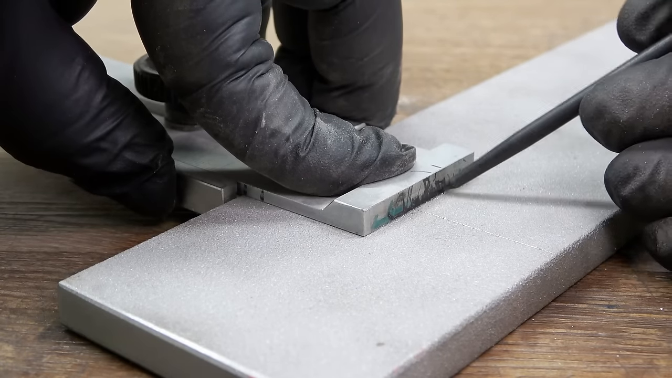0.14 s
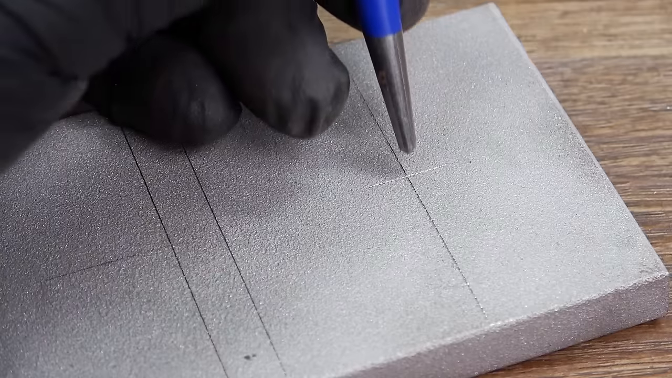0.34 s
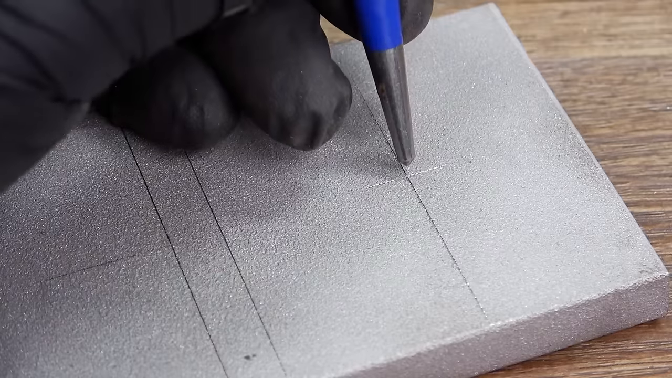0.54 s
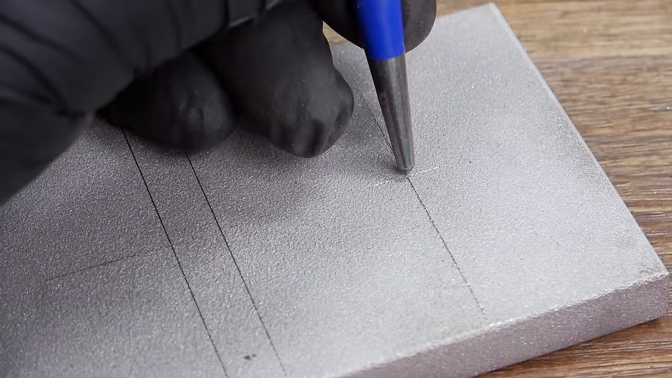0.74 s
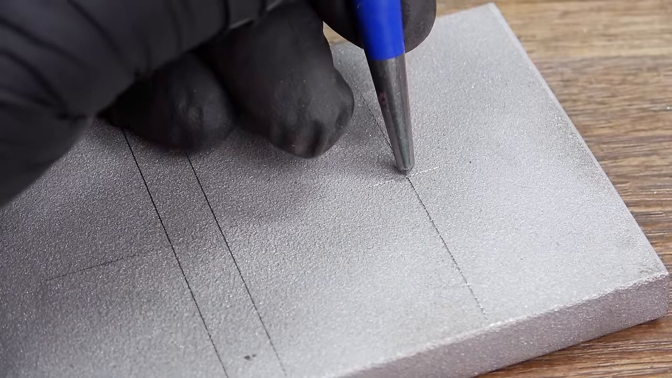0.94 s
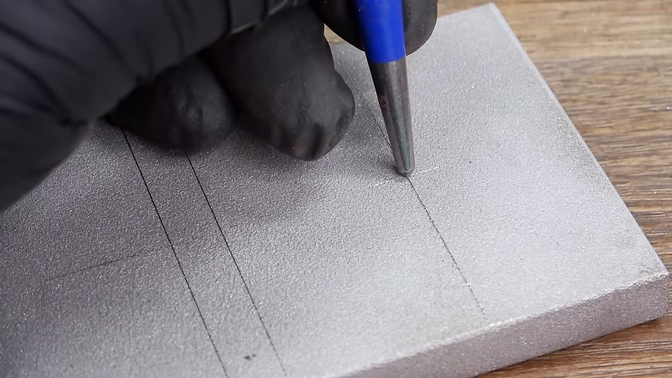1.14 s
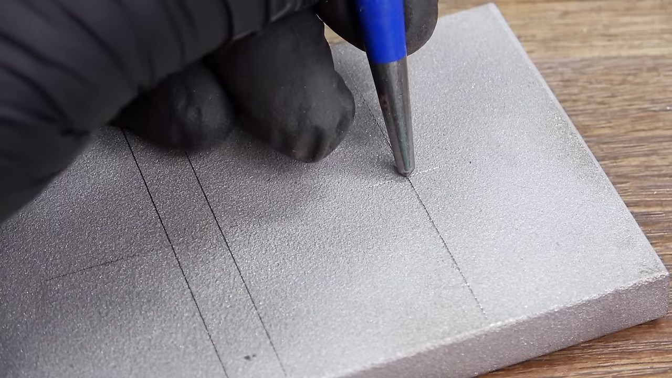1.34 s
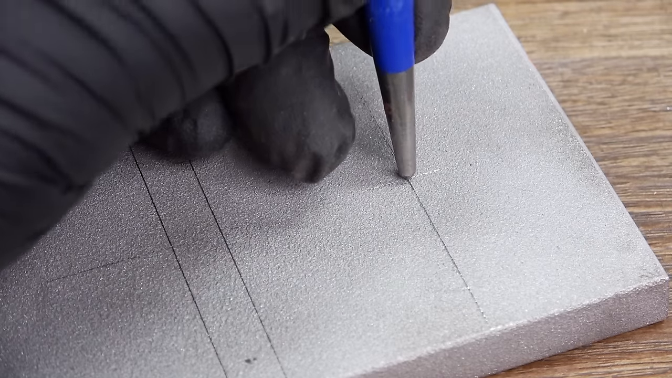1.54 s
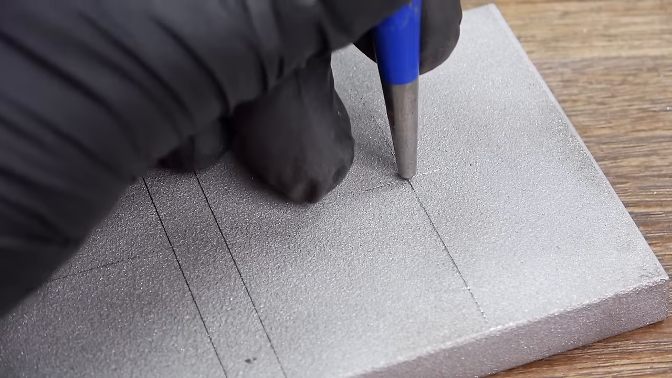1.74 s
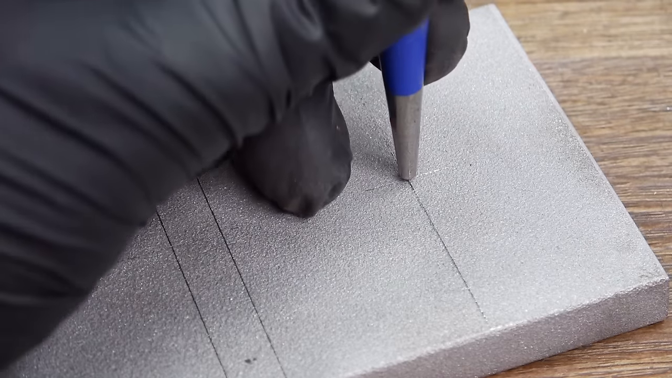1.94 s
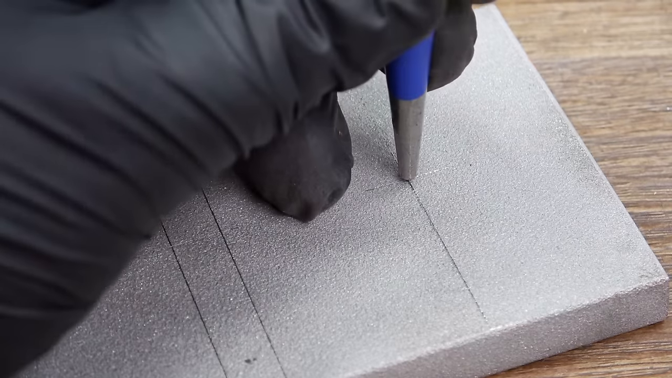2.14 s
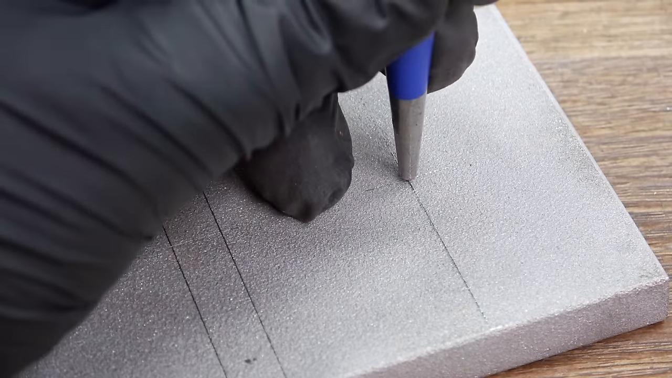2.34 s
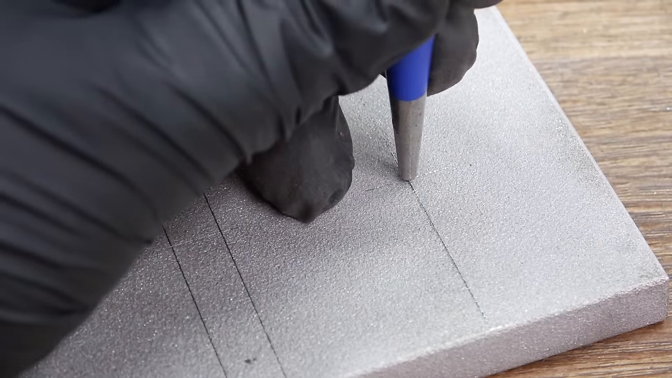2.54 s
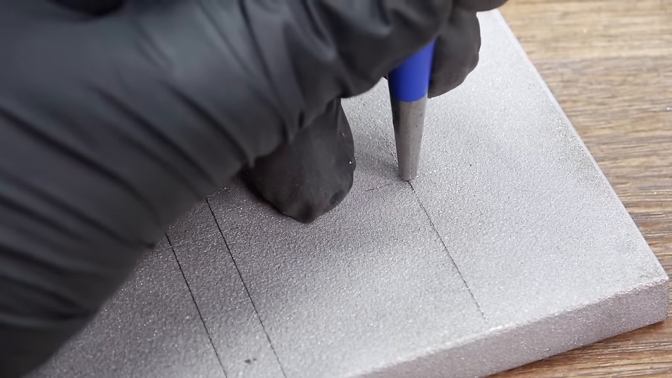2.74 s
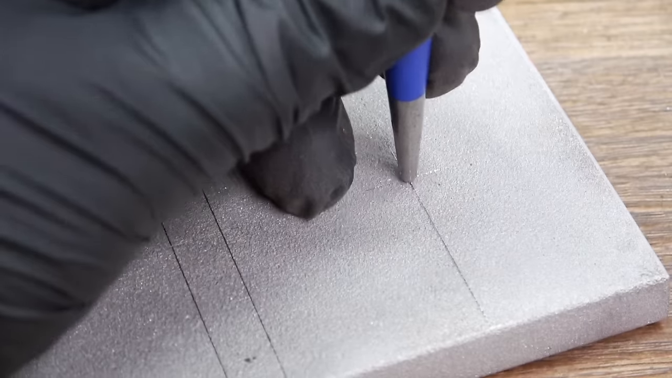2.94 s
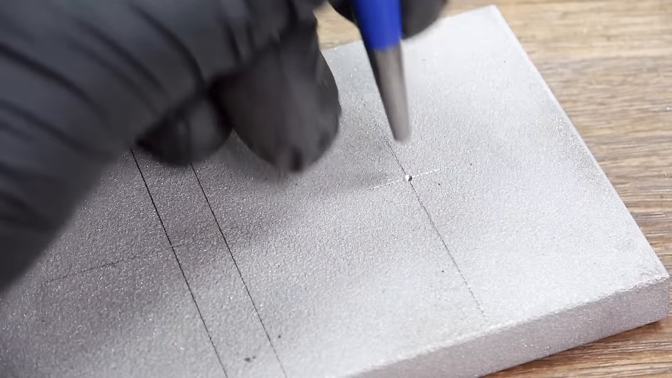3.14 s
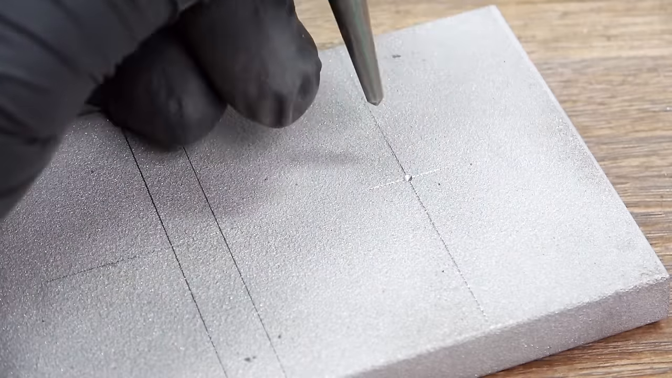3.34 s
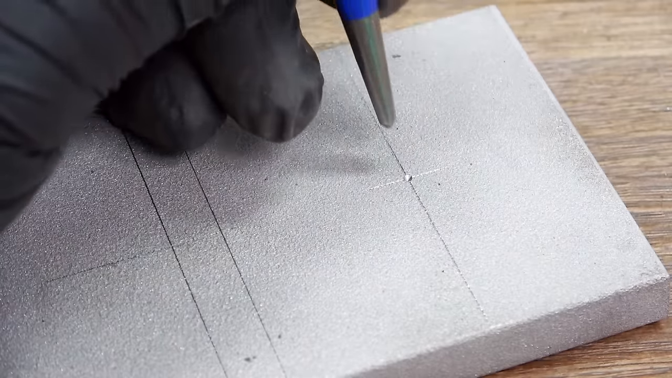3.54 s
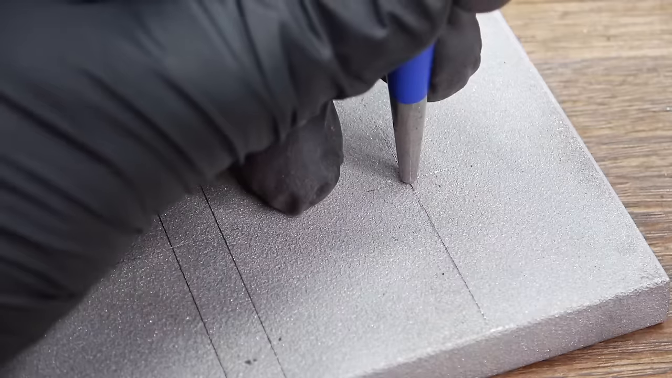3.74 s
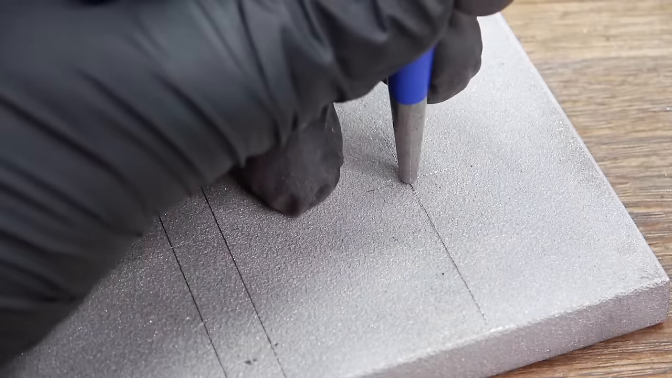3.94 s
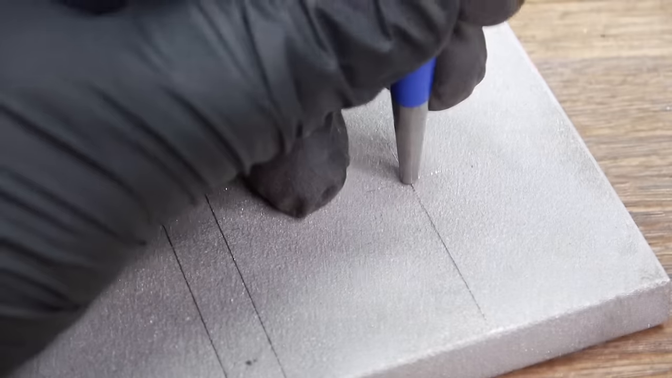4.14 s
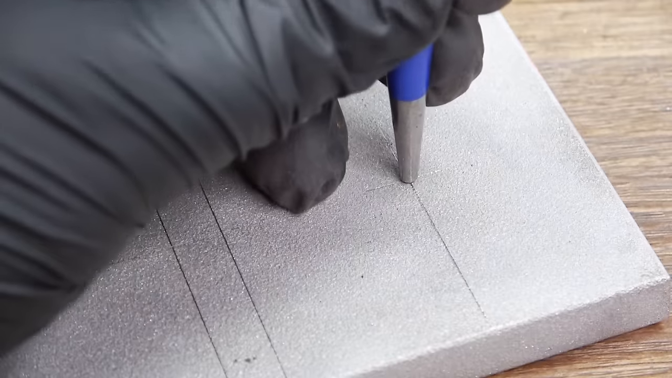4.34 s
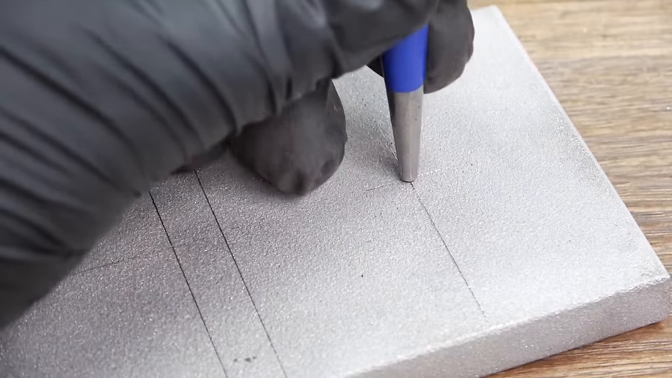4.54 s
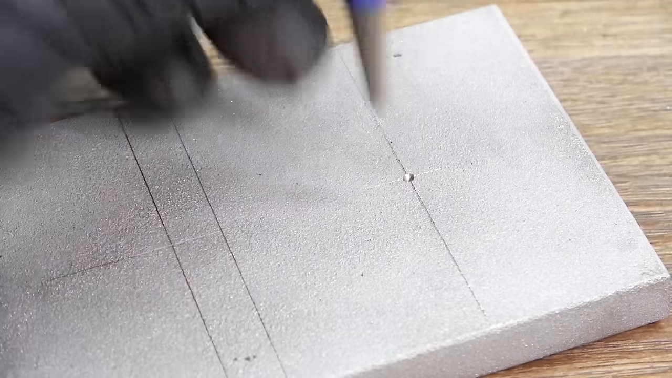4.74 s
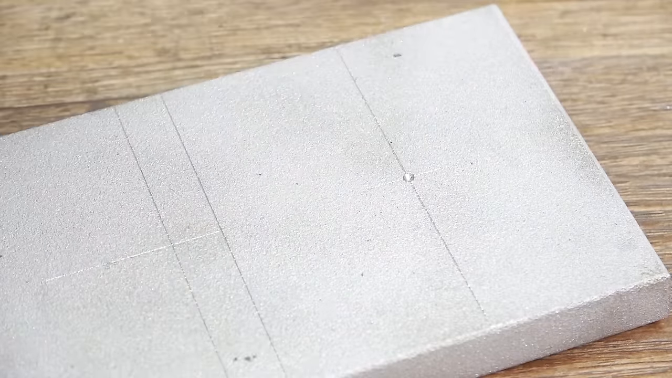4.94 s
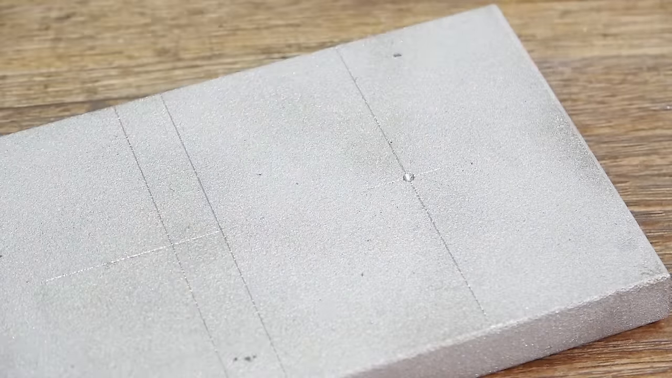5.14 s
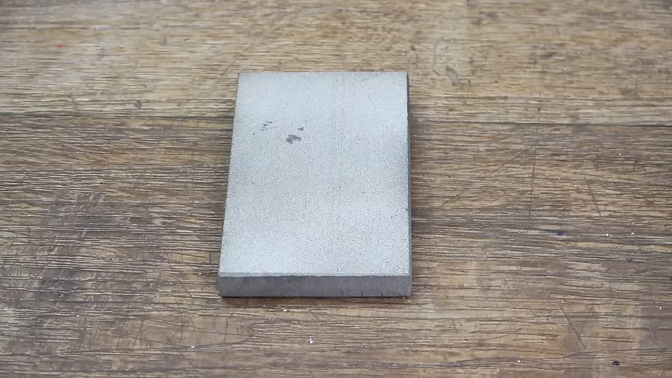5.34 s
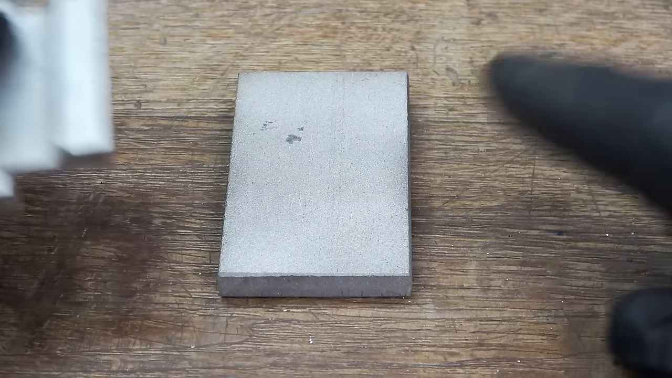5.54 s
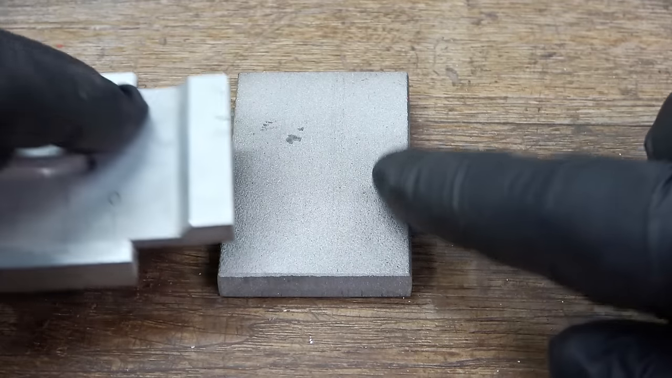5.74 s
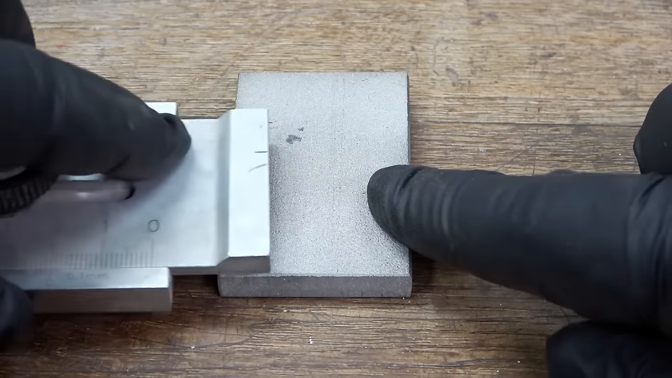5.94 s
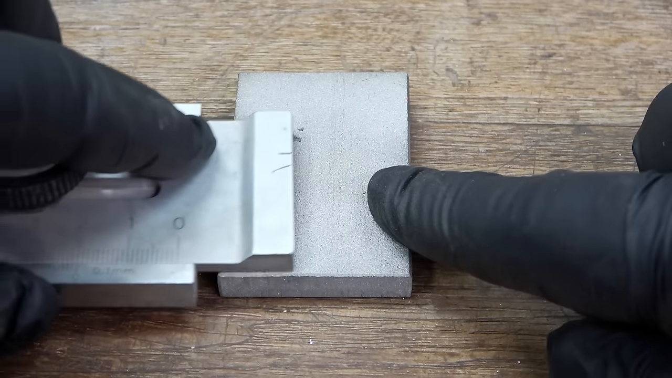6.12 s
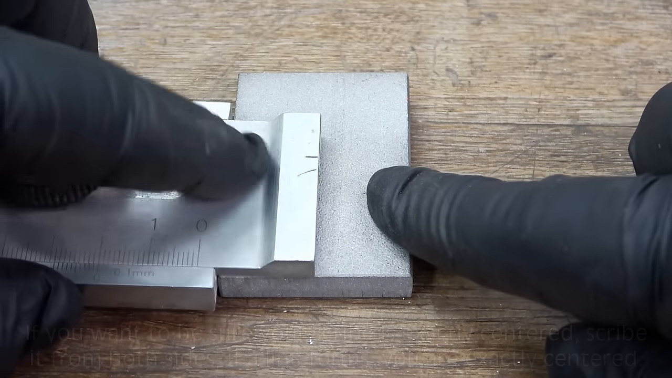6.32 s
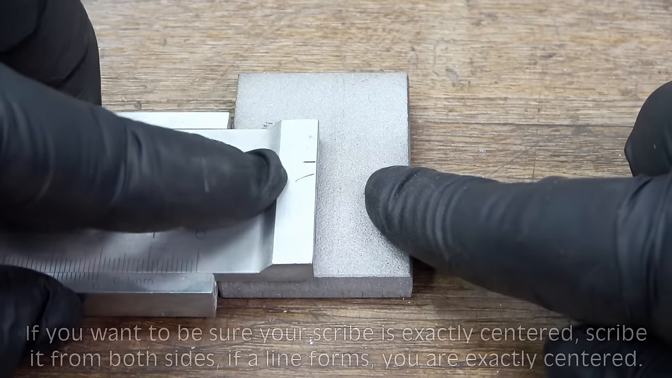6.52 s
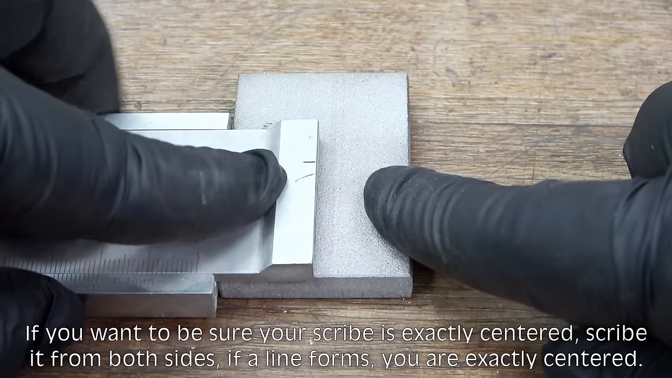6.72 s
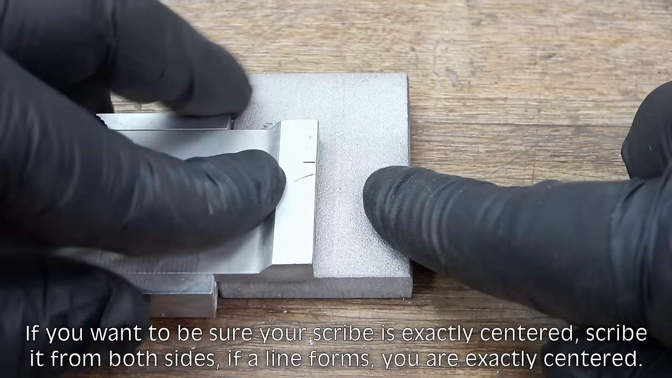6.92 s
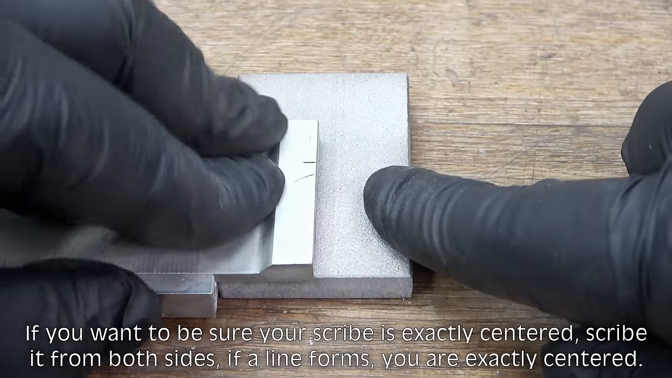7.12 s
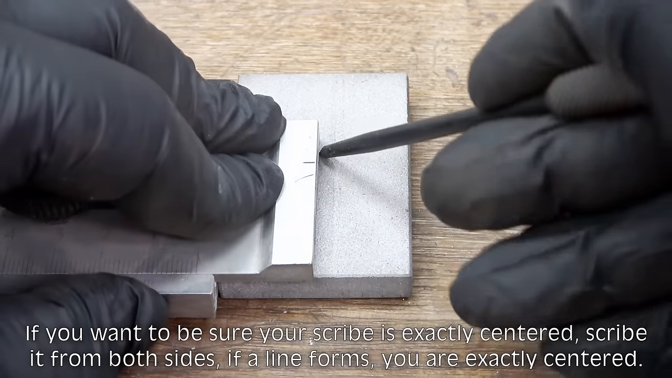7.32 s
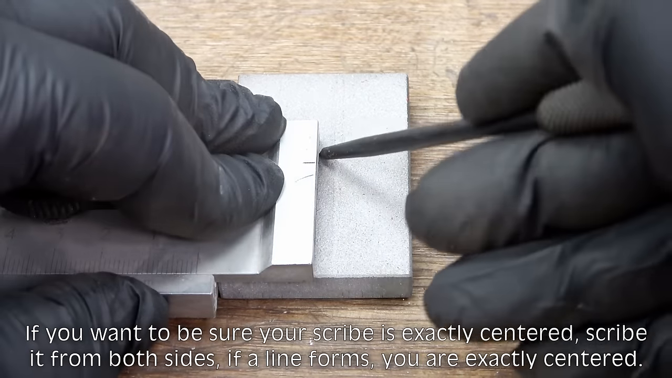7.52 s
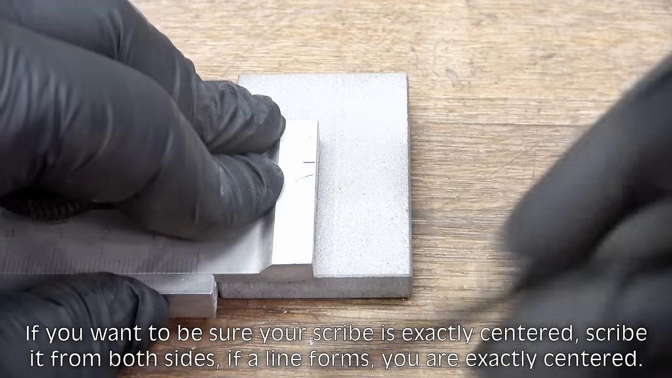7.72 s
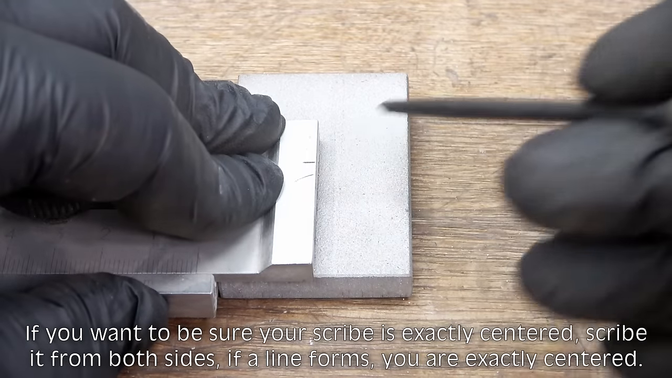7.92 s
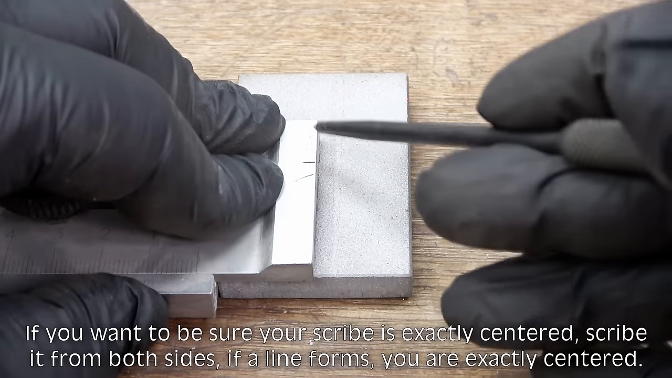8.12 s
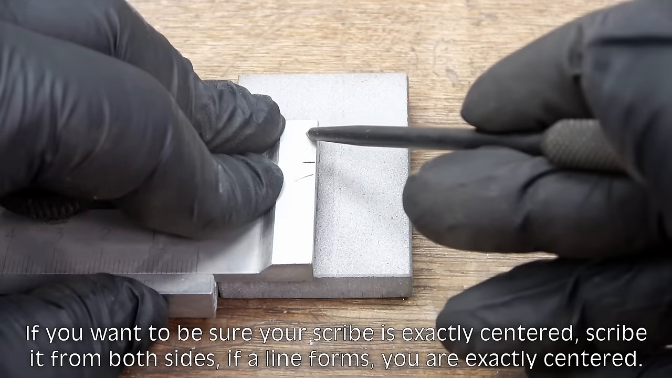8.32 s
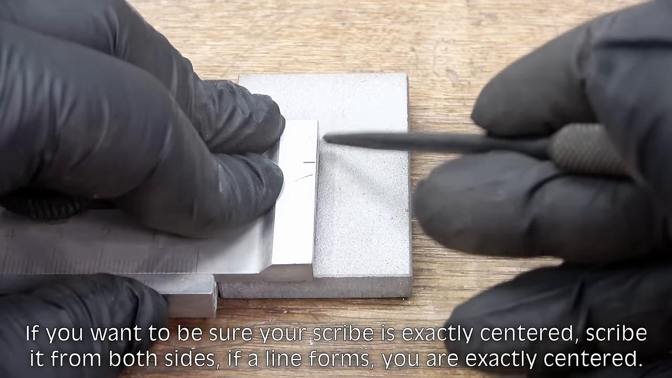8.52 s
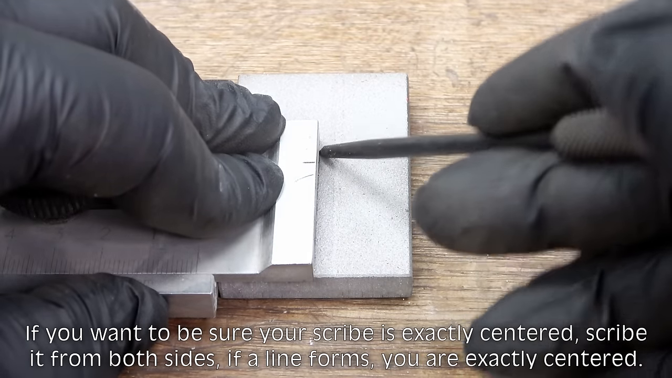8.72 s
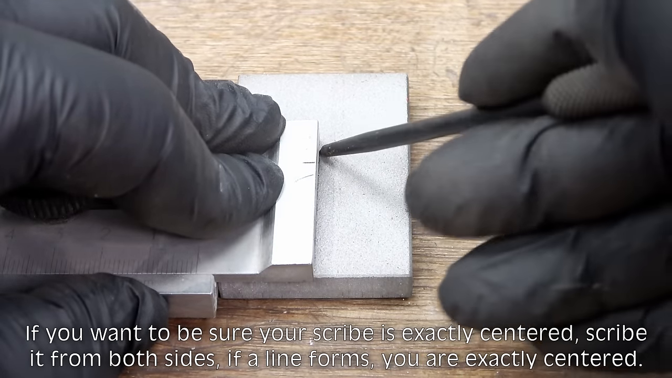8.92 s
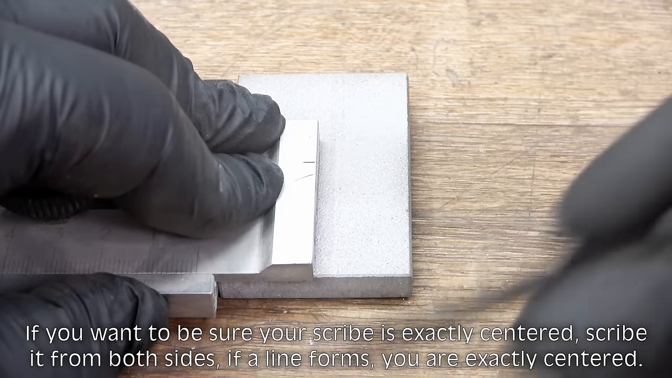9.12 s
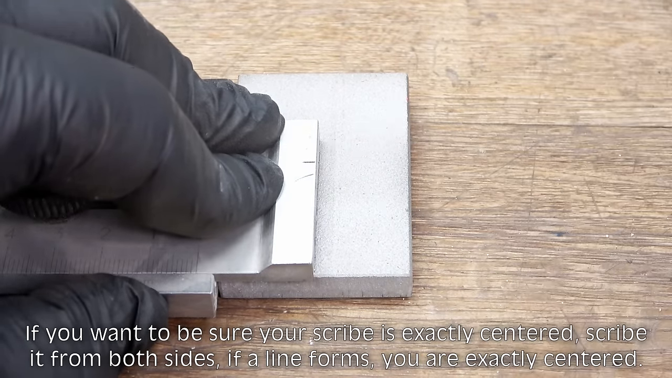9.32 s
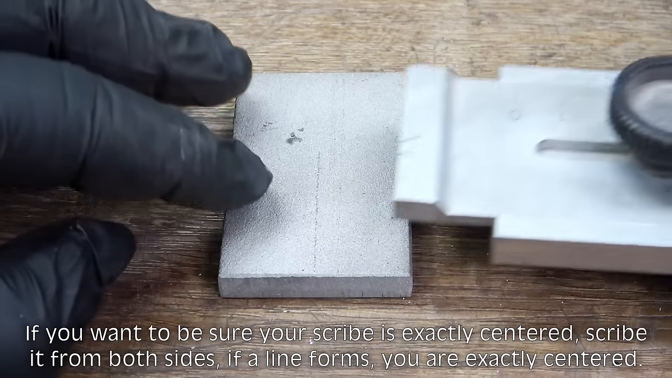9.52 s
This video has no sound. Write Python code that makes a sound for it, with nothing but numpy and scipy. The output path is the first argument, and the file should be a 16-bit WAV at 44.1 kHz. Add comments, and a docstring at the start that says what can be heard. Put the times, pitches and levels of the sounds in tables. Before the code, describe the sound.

Close stereo in a workshop with faint hiss and rumble. After the remnant of an earlier knock, a light hammer tap precedes a violent metallic bang with bassy boom, then a firmer tap and an even louder bang, its tail cut abruptly. Quiet handling and glove rustle follow, then a sharp gauge clack on steel, small knocks, brief gritty scrapes, delicate scriber scratches and a final pair of clacks.

```python
"""A hammer drives a punch into a steel plate, lightly then hard, twice: noise crack, modal knock, decaying boom.
Gauge and scriber excite modes of bench, frame and steel, by single knocks or by trains of random slips;
glove rubs are shaped hiss, over a noise floor and the tail of an earlier knock, close to a stereo microphone.
Hard blows overload the microphone, a limiter holds the peaks, and splices cut the room's tail short."""
import sys
import numpy as np
from scipy import signal
from scipy.io import wavfile
from scipy.ndimage import uniform_filter1d

SR = 44100
rng = np.random.default_rng(int(sys.argv[2]) if len(sys.argv) > 2 else 0)


def unload_wav(signal):
    """Save mono or channel-first audio to the path in sys.argv[1] as 16-bit WAV at rate SR, clipped to [-1, 1]."""
    wavfile.write(
        sys.argv[1],
        SR,
        np.round(np.clip(np.atleast_2d(signal).T, -1, 1) * 32767).astype(np.int16),
    )


N = 422037
LEAD = SR // 5  # samples of sound before time zero
RAIL_DB = -11  # the microphone's overload level

# instants where one piece ends and the next begins: start_s
SPLICE_TIMES = (.257, 3.61, 5.32, 9.437)

# relative spectrum of the background: pitch_hz, density_db
FLOOR_SPECTRUM = [(12, -34), (20, 2), (48, -6), (74, -23), (210, -18.5), (270, -21.5), (301, -21),
                  (513, -25.5), (558, -25), (897, -27), (1220, -28.5), (1860, -34), (16000, -37.5)]
# left-right likeness of the background: pitch_hz, likeness
FLOOR_LIKENESS = [(60, 0.8), (240, 0.33), (950, 0.3), (3770, 0.39), (15000, 0.22)]

# reverberation time of the room: pitch_hz, t60_s
ROOM_DECAY = [(30, 1.6), (110, 1.226), (280, 0.6), (740, 0.45), (2000, 0.45), (5000, 0.43), (9000, 0.29),
              (15000, 0.32)]
# relative spectrum of the room's answer: pitch_hz, level_db
ROOM_SPECTRUM = [(40, 0.5), (120, 0), (250, 6.5), (700, 2.5), (1500, 7.5), (4500, 9.5), (14000, 5)]
# left-right likeness of the room's answer: pitch_hz, likeness
ROOM_LIKENESS = [(60, 0.95), (200, 1), (500, .7), (1000, 0.47), (3000, 0.11), (8000, 0.11)]
# ring of the small plate on the bench within the tail: pitch_hz, width_hz, level_db, t60_s
PLATE_RESONANCE = [(1590, 440, 4, 0.4)]

# relative spectrum of the earlier knock's tail: pitch_hz, density_db
EARLIER_SPECTRUM = [(18, -38), (30, -29), (215, -5), (937, -25), (1160, -21), (1960, -30), (4190, -25),
                    (14800, -38), (16000, -69)]
# rings in that tail: pitch_hz, width_hz, level_db, t60_s
EARLIER_RESONANCES = [(1164, 41, 14.5, 0.36), (2370, 21, 23, 0.38), (4200, 47, 12, 0.52)]

# nominal modes of the bench top: pitch_hz, level_db, t60_s
BENCH_MODES = [(396, -12, 0.0084), (530, -1.5, 0.048), (640, -6, 0.032), (725, 4.5, 0.015),
               (811, 4.5, 0.025), (940, -8, 0.089), (1035, -5, 0.045), (1180, -3, 0.045), (1360, 7, 0.0097),
               (1599, -6, 0.064), (1800, -5.5, 0.014), (2100, -9, 0.04)]
# nominal modes of the bench frame: pitch_hz, level_db, t60_s
FRAME_MODES = [(92, -6, 0.13), (100.4, -9, 0.4), (148.2, -5.5, 0.2), (185.8, -1, 0.075), (253, -11, 0.089)]
# nominal modes of the steel: pitch_hz, level_db, t60_s
STEEL_MODES = [(2550, -6, .02), (3400, -9, .015), (4050, -10, .015), (4450, -8, .02), (5400, -7, .015),
               (5900, -6, .025), (6360, -5, .02), (6800, -3, .03), (7860, -2, .03), (9000, -1, .025),
               (9700, -7, .02), (11800, -3, .02), (14100, -6, .015)]

# a steel tip ticks lightly: start_s, ring_db, centre_hz
TICK_EVENTS = [(.189, -50.5, 3300), (1.555, -63.5, 4000), (1.901, -58, 7370), (1.962, -59.5, 2600),
               (2.3, -60.5, 4200), (2.355, -66, 4500), (4.69, -58, 4700), (4.987, -61.5, 6240),
               (5.329, -58.5, 3860), (7.06, -45, 7950), (7.075, -50, 4230), (8.851, -47, 6250)]
# hands and tools bump the bench: start_s, thump_db (frame), thud_db (top)
BUMP_EVENTS = [(1.525, -37, -43.5), (1.551, -52, -75), (2.295, -64, -59.5), (3.635, -36.5, -51),
               (4.689, -35.5, -78), (5.12, -39, -64), (5.895, -58.5, -72), (6.491, -52, -42)]
# gauge and scriber knock the plate: start_s, thud_db (bench top), thud_hz, thump_db (frame),
# ring_db (steel), ring_hz, room_share_db
KNOCK_EVENTS = [(6.12, -17, 910, -43, -22, 3560, -9), (6.239, -34.5, 666, -44, -27.5, 2740, -2.5),
                (6.287, -20.5, 2100, -61, -34, 5980, -18), (6.36, -28, 460, -52, -52, 4940, -6.5),
                (6.404, -37, 517, -63.5, -53, 3940, -2.5), (6.555, 7, 830, -14, 14, 6760, -13.5),
                (6.606, -17.5, 2000, -17, -3, 6350, -10), (6.635, -18.5, 1400, -48, -11, 6560, -9.5),
                (7.248, -49, 630, -79, -57.5, 4140, -1), (7.313, -51.5, 395, -85.5, -57, 4160, -11),
                (7.632, -18, 810, -32.5, -28, 4540, 3.5), (7.666, -20, 670, -46, -23.5, 6450, -6.5),
                (7.707, -10, 503, -49, -29, 4770, -5.5), (7.724, -11, 1530, -22, -32, 4480, -16.5),
                (7.752, -18.5, 1180, -48, -33.5, 4140, -10), (8.024, -48, 1420, -73.5, -48.5, 4130, -7),
                (8.295, -28, 1500, -40.5, -31.5, 5880, -10.5), (8.507, -38.5, 1502, -57, -49.5, 6810, -6),
                (8.59, -43.5, 575, -49, -32.5, 6730, -10.5), (8.628, -21.5, 530, -67, -36.5, 4000, -8.5),
                (9.027, -16.5, 755, -40.5, -38, 4160, 2), (9.084, -7.5, 1490, -53.5, -13.5, 5000, -12.5),
                (9.097, -3.5, 1590, -16, -8.5, 3740, -10)]

# glove or finger rubs: peak_s, level_db, rise_s, fall_s, lowest_hz
RUB_EVENTS = [(1.9, -73, 0.41, .7, 1790), (2.025, -54.5, 0.082, 0.083, 2800),
              (2.181, -68.5, 0.027, 0.036, 2800), (2.788, -65.5, 0.099, 0.14, 2530),
              (4.765, -61, .03, 0.04, 3200), (4.89, -69.5, 0.11, 0.049, 3500), (5.0, -78, 0.52, 1, 1800),
              (5.51, -60.5, 0.011, 0.09, 1740), (5.63, -49, 0.12, 0.12, 800),
              (5.899, -72, 0.33, 0.26, 1800), (6.105, -60, 0.094, 0.017, 1300),
              (6.409, -57.5, 0.18, 0.041, 7000), (6.901, -51.5, .15, 0.028, 3430),
              (6.95, -63, 0.1, 0.25, 1500), (6.993, -42, .022, 0.02, 2860), (7.896, -62, .04, 0.057, 5420),
              (8.078, -69, .05, .12, 3480), (8.761, -70.5, 0.059, .045, 6000)]
# relative spectrum of a rub: pitch_hz, density_db
RUB_SPECTRUM = [(300, -12), (700, 11), (1600, 11.5), (2500, 3.5), (4500, 8.5), (8000, -0.5), (15500, -10)]

# hammer blows: start_s, strength_db, brightness_db_per_octave
BLOW_EVENTS = [(2.554, -29.5, -2.2), (2.8617, -3.5, 2.26), (3.848, -19, 0.98), (4.139, 0.5, 3.5)]
# relative spectrum of the boom before tilt and added bass: pitch_hz, density_db
BOOM_SPECTRUM = [(20, -26), (60, -16.5), (120, -2), (180, -5.5), (260, -7.5), (500, -6), (850, 0.5),
                 (1100, -10.5), (1350, -4), (2400, -11), (3000, -17.5), (4300, -16), (5300, -23),
                 (6400, -26), (8000, -30), (15500, -45)]
# rings of punch, plate and bench before the shift by strength: pitch_hz, width_hz, level_db, t60_s
PUNCH_RESONANCES = [(580, 30, -24, 1.6), (1370, 60, -32, 1.3), (6200, 150, 1, .42), (8440, 60, 8, .42),
                    (9030, 50, 6, .38), (10600, 50, 5, .35), (11050, 60, 10, .36), (12000, 70, 9, .35),
                    (12900, 50, 10, .3)]
# layers of a blow against its strength: value_db (at 0 dB), slope_db_per_db
BASS_BY_STRENGTH = (3, 0.29)
RING_BY_STRENGTH = (-1, -0.5)
CRACK_BY_STRENGTH = (3.5, .57)
KNOCK_BY_STRENGTH = (13.5, -0.02)

# the gauge slides on the rough plate: start_s, length_s, grind_db, grind_hz, rasp_db, rasp_change_db (by the end)
SLIDE_EVENTS = [(6.13, 0.15, -44, 1150, -71, 14), (6.517, 0.033, -26.5, 750, -42.5, -21),
                (7.596, .11, -34, 760, -50, 15.5), (8.992, .088, -35, 800, -47.5, 14.5)]
# the scriber's tip digs in and lets go: start_s, length_s, grind_db, rasp_db (both at the crest)
SCRATCH_EVENTS = [(8.422, .03, -43.5, -38.5), (8.464, 0.047, -50, -56.5), (8.606, 0.039, -47, -59.5)]


def gain_of(db):
    """Decibel law: the amplitude ratio of a level."""
    return 10 ** (np.asarray(db) / 20)


def evened(x):
    """Normalisation to unit effective (RMS) value."""
    return x / np.sqrt(np.mean(x ** 2) + 1e-20)


def read(points, hz):
    """Interpolation of a tabulated curve on a logarithmic frequency axis."""
    f, value = np.transpose(points)
    return np.interp(np.log(hz + 1), np.log(f + 1), value)


def add(mix, start_s, sound):
    """Linear superposition of a sound at its start time."""
    part = mix[..., LEAD + round(start_s * SR):][..., :sound.shape[-1]]
    part += sound[..., :part.shape[-1]]


def noise(count, field_db, likeness, size=1024):
    """Partial coherence: stereo noise with short-time spectrum field_db(hz, t) and a likeness per band."""
    hz = np.fft.rfftfreq(size, 1 / SR)[:, None]
    t = np.arange(4 * count // size + 5) * size / 4 / SR
    a, b, c, d = rng.standard_normal((len(t), len(hz), 4)).T
    like = np.clip(read(likeness, hz), -1, 1)
    left = a + 1j * b
    right = like * left + np.sqrt(1 - like ** 2) * (c + 1j * d)
    spectra = np.array([left, right]) * gain_of(field_db(hz, t))
    return signal.istft(spectra, nperseg=size, noverlap=3 * size // 4)[1][:, :count]


def floor():
    """Stationary noise: low rumble of the building over microphone hiss."""
    def field_db(hz, t):
        return read(FLOOR_SPECTRUM, hz) + 0 * t
    return gain_of(-66) * evened(noise(N, field_db, FLOOR_LIKENESS, size=2048))


def tail(colour_db, rings=(), count=2 * SR, late_db=-49, late_t60=1.6, build_cycles=2, build_s=.005):
    """Reverberation: each band decays at its own rate over a faint slower decay; bass builds up late."""
    def field_db(hz, t):
        early = gain_of(-120 * t / read(ROOM_DECAY, hz))  # powers, hence the doubled decibels
        power = early + gain_of(2 * late_db - 120 * t / late_t60)
        for f, width, db, t60 in rings:
            resonance = 1 / (1 + (2 * (hz - f) / width) ** 2) ** 2
            power = power + gain_of(2 * db - 120 * t / t60) * resonance
        build = 1 - np.exp(-(t + 0.0038) * (hz + 1) / build_cycles)
        return colour_db(hz) + 10 * np.log10(power) + 20 * np.log10(build)
    onset = 1 - np.exp(-np.arange(count) / SR / build_s)
    return noise(count, field_db, ROOM_LIKENESS) * onset


def earlier_knock():
    """Free decay: the tail of a knock just before the start, entered 50 ms into its course."""
    late = tail(lambda hz: read(EARLIER_SPECTRUM, hz), EARLIER_RESONANCES)[:, SR // 20:]
    return gain_of(-46) * late / np.std(late[:, :SR // 10])


def ring(modes, centre_hz, octaves, dense_db, dense_t60):
    """Modal superposition: one click excites modes near a centre and a burst of dense ones; energy 1."""
    hz, db, t60 = np.transpose(modes)[..., None]
    t = np.arange(SR // 4) / SR
    spot = rng.standard_normal((2, len(modes), 1))  # each strike varies the modes' levels and pitches
    db = db + 2 * spot[0] - 6 * (np.log2(hz / centre_hz) / octaves) ** 2
    hz = hz * (1 + .01 * spot[1])
    edges_hz = np.minimum(centre_hz * 2. ** np.array([-octaves, octaves]), .45 * SR)
    band = signal.butter(2, edges_hz, "band", fs=SR)
    dense = signal.lfilter(*band, rng.standard_normal(len(t))) * gain_of(dense_db - 60 * t / dense_t60)
    body = (gain_of(db - 60 * t / t60) * np.sin(2 * np.pi * hz * t)).sum(0) + dense
    return body / np.linalg.norm(body)


def tap(thud_db, thud_hz, thump_db, ring_db, ring_hz):
    """Coupled bodies under one impulse: the bench top thuds, its frame thumps, the steel rings."""
    thud = ring(BENCH_MODES, thud_hz, 0.75, 13.8, 0.022)
    thump = ring(FRAME_MODES, 220.0, 0.86, -15.0, 0.091)
    steel = ring(STEEL_MODES, ring_hz, 0.66, 12.0, 0.025)
    layers = (thud_db, thud), (thump_db, thump), (ring_db, steel)
    return sum(gain_of(db) * part / abs(part).max() for db, part in layers)


def tick(ring_db, ring_hz):
    """Light impact: a steel tip mostly rings, with a weaker thud and thump."""
    return tap(ring_db - 15, 800, ring_db - 18, ring_db, ring_hz)


def bump(thump_db, thud_db):
    """Soft impact: the bench top and frame respond, the steel 8 dB below the thud."""
    return tap(thud_db, 479, thump_db, thud_db - 8, 4000)


def rub(peak_s, level_db, rise_s, fall_s, low_hz):
    """Friction noise: a slightly grainy hiss, dark under its lowest pitch, swelling and fading."""
    t = np.arange(-rise_s, fall_s, 1 / SR)

    def field_db(hz, t):
        return read(RUB_SPECTRUM, hz) - 20 * np.log10(1 + (low_hz / (hz + 1)) ** 4) + 0 * t
    hiss = evened(noise(len(t), field_db, [(500, 1.0), (6000, 0.51)], size=256))
    grain = gain_of(2. * evened(uniform_filter1d(rng.standard_normal(len(t)), size=130)))
    way = abs(t) / np.where(t < 0, rise_s, fall_s)
    swell_db = level_db - 20 * way ** 1.78  # an exponent of 1 is pointed, higher is rounder
    return peak_s - rise_s, hiss * grain * gain_of(swell_db) * signal.windows.tukey(len(t), .1)


def blow(db, tilt_db):
    """Impact: crack, knock, boom of bench and room, and a slow one-sided push on the microphone's working point."""
    by_strength = BASS_BY_STRENGTH, RING_BY_STRENGTH, CRACK_BY_STRENGTH, KNOCK_BY_STRENGTH
    bass_db, ring_db, crack_db, knock_db = (at + per * db for at, per in by_strength)

    def colour_db(hz):
        tilted = read(BOOM_SPECTRUM, hz) + tilt_db * np.log2(hz / 1000 + 0.045)
        return tilted + bass_db / (1 + (hz / 250) ** 2)
    boom = tail(colour_db, np.add(PUNCH_RESONANCES, [0, 0, ring_db, 0]))
    boom = boom / np.std(boom[:, :SR // 10])
    t = np.arange(boom.shape[1]) / SR
    crack = rng.standard_normal(len(t)) + 0.65 * rng.standard_normal(boom.shape)  # shared + each side's own
    crack = crack * gain_of(crack_db - 60 * t / 0.033)
    crack = uniform_filter1d(crack, size=2)  # a two-sample average softens the crack's top treble
    knock = np.pad(ring(BENCH_MODES, 1100., 0.69, 0., .02), (0, len(t)))[:len(t)] * gain_of(knock_db)
    sag_rails = .44 * max(db + 5.8, 0)  # only blows above -5.8 dB shift the working point
    delay_s, width_s = .112, .047
    push = sag_rails * gain_of(RAIL_DB) * np.exp(-((t - delay_s) / width_s) ** 2)
    return gain_of(db) * boom + crack + knock - push


def stroke(length_s, levels_db, grind_hz, rasp_hz, raw_db, slips_per_s=1500, bites_per_s=4000):
    """Stick-slip: uneven slips shake the bench; finer bites of the grain ring the steel over a raw rasp."""
    t = np.arange(0, length_s, 1 / SR)
    grind_db, rasp_db = levels_db(t / length_s)
    attack = np.minimum(t / .003, 1)
    out = 0
    for spot in (.75, 1, 1.4):  # three patches of contact, duller to brighter
        grind = ring(BENCH_MODES, grind_hz * spot, 0.53, 19.0, 0.013)
        rasp = ring(STEEL_MODES, rasp_hz * spot, 0.73, raw_db, 0.011)
        layers = (grind, slips_per_s, grind_db, 5.5), (rasp, bites_per_s, rasp_db, 4.5)
        for body, rate, db, size_db in layers:
            sizes = gain_of(size_db * np.minimum(rng.exponential(1, len(t)), 3))
            sizes = sizes * rng.choice([-1, 1], len(t))
            slips = sizes * (rng.random(len(t)) < rate / 3 / SR)
            train = evened(slips) * gain_of(db) * attack
            out = out + signal.fftconvolve(train, body / np.sqrt(3))
    return out


def slide(length_s, grind_db, grind_hz, rasp_db, change_db):
    """Sliding friction: the pressure holds, then changes toward the stop."""
    def levels_db(u):
        change = change_db * u ** 1.8  # the change comes late
        return grind_db + .35 * change, rasp_db + change
    return stroke(length_s, levels_db, grind_hz, 5400., raw_db=18.5)


def scratch(length_s, grind_db, rasp_db):
    """Stick-slip of a point: one swell of pressure, 14 dB down at its ends; the steel rings clearly."""
    def levels_db(u):
        return np.add.outer([grind_db, rasp_db], -14 * (2 * u - 1) ** 2)
    return stroke(length_s, levels_db, 1500., 7300.0, raw_db=11.5)


def contacts():
    """Contact excitation: each tick, bump, knock, slide and scratch as (start s, sound, room share dB)."""
    for start_s, *row in TICK_EVENTS:
        yield start_s, tick(*row), -6.5
    for start_s, *row in BUMP_EVENTS:
        yield start_s, bump(*row), -3
    for start_s, *row, share_db in KNOCK_EVENTS:
        yield start_s, tap(*row), share_db
    for start_s, *row in SLIDE_EVENTS:
        yield start_s, slide(*row), -4.
    for start_s, *row in SCRATCH_EVENTS:
        yield start_s, scratch(*row), -14.


def scene():
    """Superposition of direct and reverberant sound; each piece between splices has its own tail, cut at its end."""
    close, sent, rubs = np.zeros(N + LEAD), np.zeros(N + LEAD), np.zeros((2, N + LEAD))
    for start_s, sound, share_db in contacts():
        add(close, start_s, sound)
        add(sent, start_s, gain_of(share_db) * sound)
    for row in RUB_EVENTS:
        add(rubs, *rub(*row))
    out = np.zeros((2, N + LEAD))
    edges = [0] + [LEAD + round(s * SR) for s in SPLICE_TIMES] + [N + LEAD]
    for a, b in zip(edges, edges[1:]):
        room = tail(lambda hz: read(ROOM_SPECTRUM, hz), PLATE_RESONANCE, count=SR)
        room = room / np.linalg.norm(room[0])
        wet = signal.fftconvolve(sent[None, a:b], room, axes=1)[:, :b - a]
        piece = np.zeros((2, b))
        for start_s, *row in BLOW_EVENTS:
            if a < LEAD + start_s * SR < b:
                add(piece, start_s, blow(*row))
        if a == 0:
            add(piece, 0, earlier_knock())
        out[:, a:b] = close[a:b] + wet + piece[:, a:]
    return (out + rubs)[:, LEAD:] + floor()


def record(dry):
    """Nonlinear transduction: overload at the rails, high-pass, a limiter slow by a few ms, band limit."""
    rail = gain_of(RAIL_DB)
    coupling = signal.butter(1, 18., "high", fs=SR)
    clipped = signal.lfilter(*coupling, np.clip(dry, -rail, rail))
    keep = np.exp(-1 / (.003 * SR))  # 3 ms power averaging
    power = signal.lfilter([1 - keep], [1, -keep], (clipped ** 2).mean(0))
    power_db = 10 * np.log10(power + 1e-18)
    fall = np.arange(N) * 80 / SR  # recovers 80 dB a second
    held_db = np.maximum.accumulate(power_db + fall) - fall
    over_db = np.maximum(held_db + 26.0, 0)  # threshold -26 dB
    ceiling = .125  # what slips past the limiter is rounded off
    limited = ceiling * np.tanh(clipped / gain_of(over_db) / ceiling)
    lowpass = signal.firwin(255, 15900, window=("kaiser", 9), fs=SR)
    return signal.oaconvolve(limited, lowpass[None], "same")


dry = scene()
out = record(dry)
unload_wav(out)
```